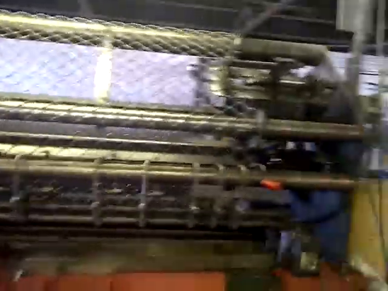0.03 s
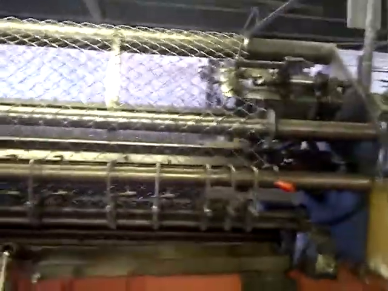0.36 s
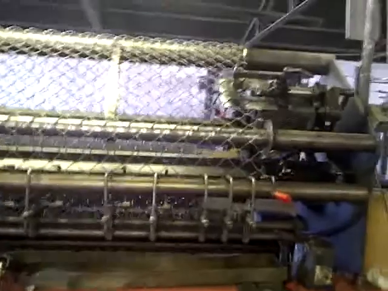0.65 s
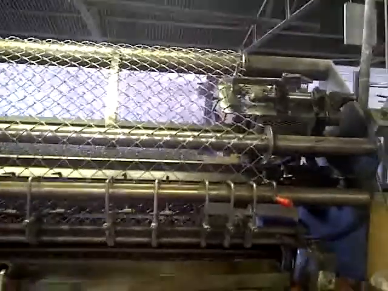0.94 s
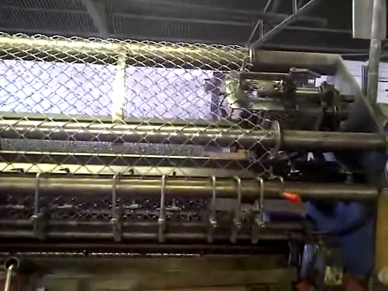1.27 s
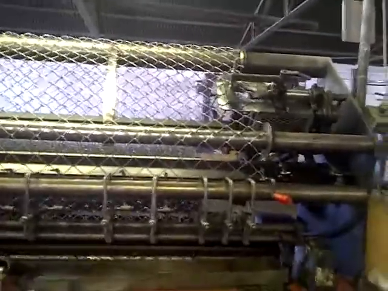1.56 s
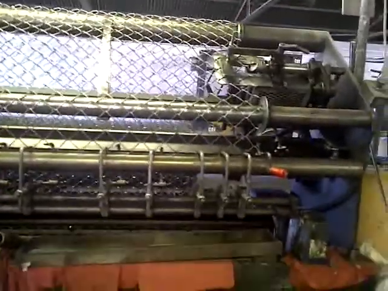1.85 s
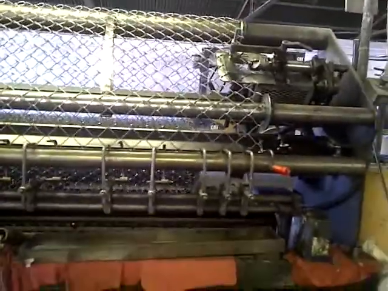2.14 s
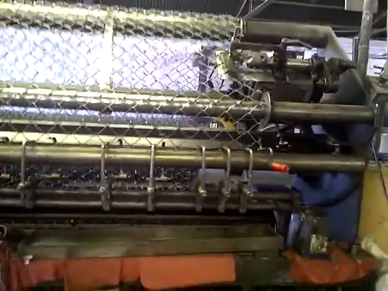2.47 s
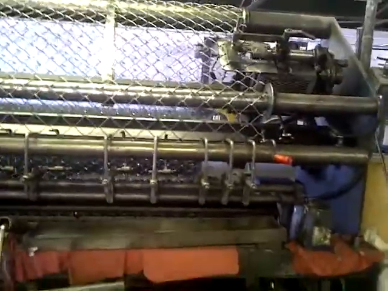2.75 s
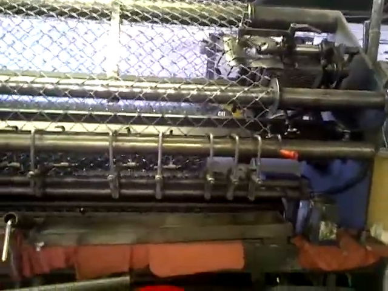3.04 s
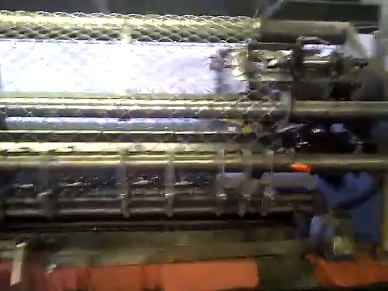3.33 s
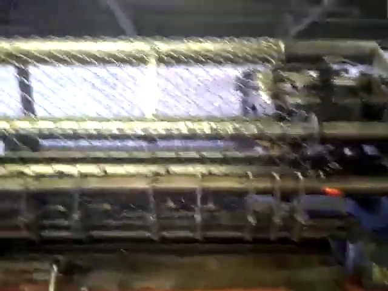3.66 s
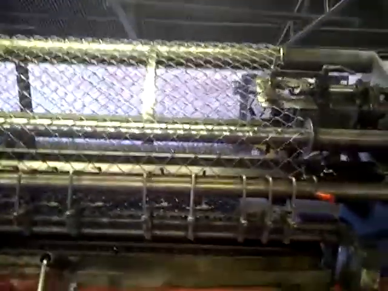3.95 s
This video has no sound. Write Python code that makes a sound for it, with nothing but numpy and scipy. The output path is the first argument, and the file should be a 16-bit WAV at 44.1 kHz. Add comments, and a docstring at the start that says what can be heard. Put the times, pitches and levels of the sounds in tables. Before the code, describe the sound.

A wire-netting machine runs with a dense, rattling roar in a factory hall. Its metal frame clanks in clusters and wire scrapes through guides. A sharp tick sounds close by, and later a bearing squeals briefly twice.

```python
"""A wire-netting machine runs in a factory hall. From the start its rattling spindles merge into a roar
over shaft hum, gear whine and rumble, while wire scrapes through the guides and a dry bearing rubs.
Dull blows strike the bed, the frame clanks in bursts about every 1.6 s, and the wire chinks.
Gain control ducks after loud blows, deepest at 1.7 s after a sharp tick close by.
Near 2.8 s, and again near the end, the bearing catches and squeals by stick-slip friction."""
import sys
import numpy as np
from scipy import signal
from scipy.fft import rfft, irfft, next_fast_len
from scipy.io import wavfile
from scipy.ndimage import map_coordinates

SR = 44100
rng = np.random.default_rng(int(sys.argv[2]) if len(sys.argv) > 2 else 0)


def unload_wav(signal):
    """Save mono or channel-first audio to the path in sys.argv[1] as 16-bit WAV at rate SR, clipped to [-1, 1]."""
    wavfile.write(
        sys.argv[1],
        SR,
        np.round(np.clip(np.atleast_2d(signal).T, -1, 1) * 32767).astype(np.int16),
    )


N = 176400
T = np.arange(N) / SR


def amp(db):
    """Decibels to amplitude ratio."""
    return 10 ** (np.asarray(db) / 20)


def unit(x):
    """Normalisation to rms 1."""
    return x / np.sqrt(np.mean(x ** 2) + 1e-20)


def colour(points, hz):
    """Gain interpolated from (Hz, dB) points on a logarithmic frequency axis."""
    f, db = np.transpose(points)
    return amp(np.interp(np.log(hz + 1), np.log(f + 1), db))


def curve(rows):
    """Linear interpolation of (seconds, value) rows at every sample."""
    return np.interp(T, *np.transpose(rows))


def wobble(rate):
    """Smooth random modulation with rate knots a second."""
    return map_coordinates(rng.standard_normal(int(N * rate / SR) + 4), [T * rate])


def filtered(x, response):
    """Linear filtering: the spectrum is multiplied by a frequency response."""
    size = next_fast_len(len(x) + 8192)
    return irfft(rfft(x, size) * response(np.fft.rfftfreq(size, 1 / SR)), size)[:len(x)]


def noise(response, size=N):
    """Filtered Gaussian noise of rms 1."""
    return unit(filtered(rng.standard_normal(size), response))


def resonance(f, hz, width):
    """Frequency response of a damped oscillator."""
    return 1j * f * width / (hz * hz - f * f + 1j * f * width)


def bursts(rows, response, rise_s, t60, hold_s=0):
    """Impact excitation: each (seconds, dB, colour..) blow rings close modes that decay together."""
    out, t = np.zeros(N + SR), T[:SR // 4]
    envelope = (1 - np.exp(-t / rise_s)) * amp(-60 * np.maximum(t - hold_s, 0) / t60)
    for start, db, *tone in rows:
        ring = envelope * noise(lambda f: response(f, *tone), size=len(t))
        ring *= np.linalg.norm(envelope) / np.linalg.norm(ring) / envelope.max()
        out[int(start * SR):][:len(t)] += amp(db) * ring
    return out[:N]


def singing(modes, waver_db):
    """Partials under random amplitude and frequency modulation, rms 1."""
    out = np.zeros(N)
    for hz, deviation, db in modes:
        gain = amp(db + waver_db * wobble(30))
        out += gain * np.sin(2 * np.pi * np.cumsum(hz + deviation * wobble(120)) / SR)
    return unit(out)


# Spectrum of the spindles. Each row: frequency in Hz, relative density in dB.
SPINDLE_SPECTRUM = [(21, -45), (35, -22.5), (54, -24), (75, -10.5), (164, -4.5), (201, -1), (269, -2),
                    (314, -1), (563, -2.5), (753, -2), (985, -3), (1580, -3), (2160, -6), (3380, -14.5),
                    (3610, -16), (4830, -15.5), (5410, -20), (6470, -22), (7400, -45.5), (9620, -72),
                    (16300, -120)]
# Colouring from the far side of the hall. Each row: frequency in Hz, gain in dB.
HALL_COLOUR = [(120, 0.5), (220, -0.5), (500, -1), (800, 2), (2200, 0), (3500, -2), (6000, -10)]

def spindles(impacts_per_s=260, t60=0.023):
    """Incoherent superposition: many small impacts rattle over their own even wash in the hall."""
    tone = lambda f: colour(SPINDLE_SPECTRUM, f) * colour(HALL_COLOUR, f)
    wash = noise(tone) * amp(0.57 * wobble(14))
    energy_decay = amp(-60 * T[:SR // 8] / t60) ** 2
    rattle = np.zeros(N)
    for hz in (750, 1400, 2480, 4400):
        hits = (rng.random(N) < impacts_per_s / 4 / SR) * amp(rng.uniform(-5.5, 0, N))
        envelope = np.sqrt(np.abs(signal.fftconvolve(hits ** 2, energy_decay)[:N]))
        impacts = envelope * rng.standard_normal(N)
        rattle += filtered(impacts, lambda f: tone(f) * resonance(f, hz, hz * 1.35))
    return amp(-19) * wash + amp(-23.5) * unit(rattle)


# Partials of shaft and motor. Each row: frequency in Hz, rms level in dB.
SHAFT_PARTIALS = [(28.7, -52), (57.4, -56.5), (86, -51.5), (115, -47), (199, -41)]

def shaft():
    """Forced vibration: steady rotation gives a low, slightly wavering line spectrum."""
    return np.sqrt(2) * sum(amp(db + 1.4 * wobble(7)) * np.sin(2 * np.pi * hz * T + 0.2 * wobble(4))
                            for hz, db in SHAFT_PARTIALS)


# Swell of the whine. Each row: time in seconds, level in dB.
WHINE_LEVEL = [(0, -36.5), (1, -38), (1.55, -30.5), (2, -35.5), (2.6, -28.5), (3.2, -31), (3.7, -28),
               (4, -52)]
# Gear tones. Each row: frequency in Hz, random deviation in Hz, relative level in dB.
GEAR_TONES = [(746, 9, 0.5), (771, 25, -5.5), (901, 23.86, -4)]

def gears():
    """Periodic forcing: the gears whine in narrow, wavering lines."""
    return amp(curve(WHINE_LEVEL)) * singing(GEAR_TONES, waver_db=4.5)


# Swell of the rumble. Each row: time in seconds, relative level in dB.
RUMBLE_LEVEL = [(0, -23), (.5, -24), (1, -25.5), (1.3, -22.5), (1.45, -25), (1.9, -23), (2.3, -22.5),
                (2.75, -27.5), (3.1, -31), (3.45, -27), (3.8, -32), (4, -25)]
# Its spectrum. Each row: frequency in Hz, relative density in dB.
RUMBLE_SPECTRUM = [(70, -32.5), (140, -5.5), (210, 2), (350, 1.5), (520, -5), (900, -43)]

def rumble():
    """Random vibration: the machine bed radiates a band of low noise."""
    return amp(curve(RUMBLE_LEVEL) - 3.5) * noise(lambda f: colour(RUMBLE_SPECTRUM, f))


# Swell of the scraping wire. Each row: time in seconds, level in dB.
SCRAPE_LEVEL = [(0, -25.5), (.2, -36.5), (.48, -35), (.58, -27), (.78, -39.5), (1.05, -30.5), (1.35, -30.5),
                (1.53, -27), (1.68, -30), (1.85, -37), (2.06, -34), (2.16, -25), (2.3, -37.5), (2.6, -31),
                (3.1, -29), (3.45, -28), (3.8, -27.5), (4, -36.5)]
# Its spectrum. Each row: frequency in Hz, relative density in dB.
SCRAPE_SPECTRUM = [(1500, -28), (2800, 1.5), (3900, 0), (5000, -6), (6700, -11.5), (7600, -17)]

def wire_scrape(flutter_db=1.2):
    """Sliding friction: wire drawn through the guides makes bright, fluttering noise."""
    envelope = amp(curve(SCRAPE_LEVEL) + flutter_db * wobble(70))
    return envelope * noise(lambda f: colour(SCRAPE_SPECTRUM, f))


# Rubbing of the bearing. Each row: time in seconds, level in dB.
RUB_LEVEL = [(0, -38), (.7, -42), (1.3, -49.5), (1.55, -38), (1.8, -46.5), (2.42, -53), (2.48, -29.5),
             (2.55, -42), (2.78, -36), (2.94, -34), (3.05, -36), (3.3, -36.5), (3.45, -45.5), (3.65, -36),
             (3.75, -47), (3.83, -32), (4, -40)]

def bearing_rub():
    """Resonance driven by friction: the dry bearing gives a faint, narrow band of noise."""
    return amp(curve(RUB_LEVEL)) * noise(lambda f: resonance(f, hz=3580, width=110) ** 2)


# Blows on the bed. Each row: start in seconds, level in dB, centre in Hz, 60 dB decay time in seconds.
BED_BLOWS = [(0.111, -19, 218, 0.13), (1.683, -7.5, 420, 0.013), (1.885, -18.5, 303, 0.22),
             (1.953, -16.5, 300, 0.12), (2.878, -13.5, 740, 0.015)]

def thuds():
    """Damped free vibration: each blow excites a broad, low band of the bed's modes."""
    response = lambda f, hz: resonance(f, hz, hz * 0.87) ** 2
    return sum(bursts([blow], response, rise_s=0.0014, t60=t60) for *blow, t60 in BED_BLOWS)


# Blows on the frame. Each row: start in seconds, relative level in dB, centre in Hz,
# offset in dB for the ring of the bars.
FRAME_BLOWS = [(0.272, -16, 1380, -4), (0.403, -11.5, 1690, -2.5), (.453, -13, 910, -2),
               (.639, -15.5, 2100, -4.5), (.676, -17, 2140, -2), (0.736, -11, 1520, -4.5),
               (.787, -17, 2100, -2.5), (1.385, -13.5, 1210, -8), (1.443, -16, 2010, -5),
               (1.83, -17, 1250, -1.5), (1.852, -18, 1640, 1), (1.978, -13, 1720, 0),
               (2.030, -11, 1105, -3), (2.215, -14, 2380, -4), (2.277, -20.5, 1950, -4),
               (2.315, -7.5, 1780, -6), (2.399, -17, 1990, -6), (2.922, -20, 2100, 0),
               (2.988, -17, 850, -2), (2.994, -16, 2670, -6), (3.049, -10.5, 1610, -9.5),
               (3.546, -16.5, 1600, -8), (3.612, -14, 1004, -2), (3.69, -13, 1800, -7)]
# Modes of the frame. Each row: frequency in Hz, bandwidth in Hz, gain in dB.
FRAME_MODES = [(754, 36, 5.5), (1072, 150, -2.5), (1494, 140, 2.5), (1940, 240, -1), (2114, 360, 2),
               (2660, 840, -4.5)]
CLANK_HOLD_S = 0.007

def frame_clanks(spread_octaves=0.46, skirt_db=-4.5):
    """Modal superposition: each blow rings the frame noisily, most strongly around its own centre."""
    def response(f, centre):
        modes = sum((-1) ** k * amp(db) * resonance(f, hz, width)
                    for k, (hz, width, db) in enumerate(FRAME_MODES))
        focus = np.exp(-0.5 * (np.log2((f + 1) / centre) / spread_octaves) ** 2)
        return modes * (focus + amp(skirt_db))
    blows = [blow[:3] for blow in FRAME_BLOWS]
    return amp(-1.5) * bursts(blows, response, rise_s=0.003, t60=0.053, hold_s=CLANK_HOLD_S)


# Modes of the steel bars. Each row: frequency in Hz, relative level in dB.
BAR_MODES = [(823, 5), (1049, -3.5), (1380, -3), (1475, -4), (1675, -4.5), (1778, 0.5), (2120, 0),
             (2390, -3.5), (2600, -2)]

def bars(rise_s=0.003, t60=0.1, spread_octaves=0.27):
    """Normal modes: each clank leaves the bars ringing in the pure tones nearest its centre."""
    out, t = np.zeros(N + SR), T[:SR // 4]
    hz, mode_db = np.transpose(BAR_MODES)
    envelope = (1 - np.exp(-t / rise_s)) * amp(-60 * np.maximum(t - CLANK_HOLD_S, 0) / t60)
    for start, db, centre, offset_db in FRAME_BLOWS:
        focus = np.exp(-0.5 * (np.log2(hz / centre) / spread_octaves) ** 2)
        gains = amp(mode_db + rng.standard_normal(len(hz))) * focus
        partials = np.sin(2 * np.pi * (hz[:, None] * t + rng.random((len(hz), 1))))
        ring = envelope * (gains @ partials)
        ring *= np.linalg.norm(envelope) / np.linalg.norm(ring)
        out[int(start * SR):][:len(t)] += amp(db + offset_db) * ring
    return out[:N]


def hall(x, t60=0.14):
    """Reverberation: the diffuse field of the hall decays exponentially."""
    tail = rng.standard_normal(SR) * amp(-60 * T[:SR] / t60)
    return signal.fftconvolve(x, tail / np.linalg.norm(tail))[:N]


# Chinks of the wire. Each row: start in seconds, level in dB, centre in Hz, resonance width in Hz.
WIRE_STRIKES = [(.532, -30.5, 4770, 1400), (.922, -30, 3950, 130), (2.118, -32, 4720, 1400),
                (2.235, -18.5, 2000, 200), (2.355, -27, 3920, 110), (2.402, -33, 4560, 1280),
                (2.985, -23, 3060, 1200), (3.085, -33, 5640, 1500), (3.828, -34, 4900, 1200)]

def wire_chinks():
    """Impact excitation: the wire strikes its guides and rings in a high band."""
    return bursts(WIRE_STRIKES, lambda f, hz, width: resonance(f, hz, width) ** 2,
                  rise_s=0.0056, t60=0.17)


# Ticks close by. Each row: start in seconds, level at the source in dB, centre in Hz.
NEAR_TICKS = [(1.6845, -11.5, 5200), (1.7095, 9.5, 14100)]

def ticks():
    """Impulsive sound: a very short pulse has a broad spectrum and is heard as a dry tick."""
    return bursts(NEAR_TICKS, lambda f, hz: resonance(f, hz, hz * 0.6) ** 2,
                  rise_s=0.00013, t60=0.0024)


# Swell of the squeal. Each row: time in seconds, level in dB.
SQUEAL_LEVEL = [(0, -48.5), (2.55, -55), (2.70, -40), (2.79, -25.5), (2.825, -35), (2.865, -28),
                (2.92, -42), (3.1, -56), (3.86, -49), (3.925, -28), (3.96, -39), (4, -38)]
# Modes of the bearing. Each row: frequency in Hz, random deviation in Hz, relative level in dB.
BEARING_MODES = [(3712, 9, 0), (3650, 25, -9)]

def bearing_squeal(roughness_db=3):
    """Stick-slip oscillation: the catching bearing sings roughly, just above its rubbing band."""
    slip = unit(amp(roughness_db * wobble(160)))
    return amp(curve(SQUEAL_LEVEL)) * slip * singing(BEARING_MODES, waver_db=1)


def scene():
    """Superposition: all sources add in front of the rollers, and the clanks reverberate."""
    running = spindles() + shaft() + gears() + rumble() + wire_scrape() + bearing_rub()
    clanks = frame_clanks() + bars()
    impacts = thuds() + clanks + amp(-8.5) * hall(clanks) + wire_chinks() + ticks()
    return (running + impacts + bearing_squeal())[None]


def record(dry):
    """Automatic gain control ducks fast and recovers steadily; soft clipping and a low-pass follow."""
    threshold_db, release_db_per_s, window_s = -16.5, 113, 0.016
    ceiling, hardness, cutoff_hz = 0.64, 6, 7280
    x = dry[0]
    size = int(window_s * SR)
    power = np.abs(signal.fftconvolve(x ** 2, np.ones(size) / size)[:N])
    excess_db = np.maximum(10 * np.log10(power + 1e-12) - threshold_db, 0)
    recovery_db = release_db_per_s * T
    x = x * amp(recovery_db - np.maximum.accumulate(excess_db + recovery_db))
    x = x / (1 + np.abs(x / ceiling) ** hardness) ** (1 / hardness)
    return filtered(x, lambda f: 1 / np.sqrt(1 + (f / cutoff_hz) ** 100))[None]


dry = scene()
out = record(dry)
unload_wav(out)
```